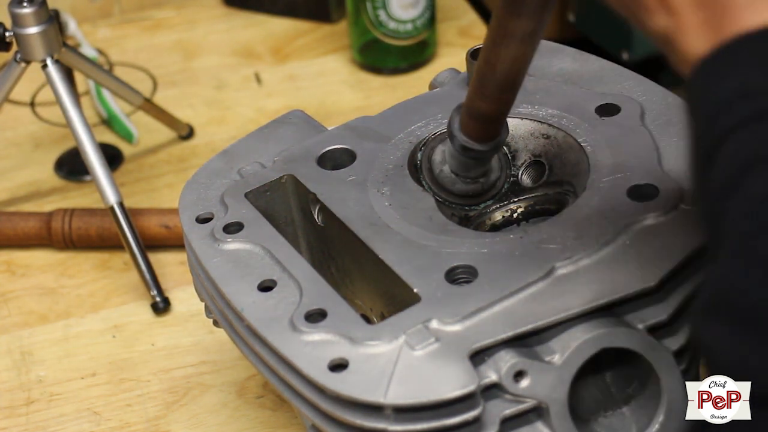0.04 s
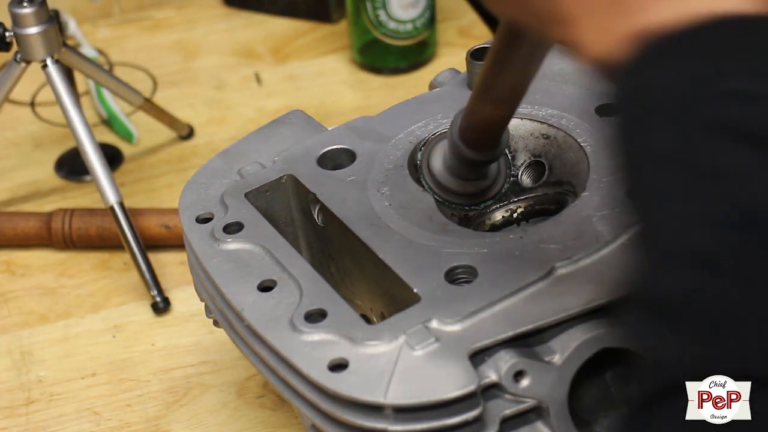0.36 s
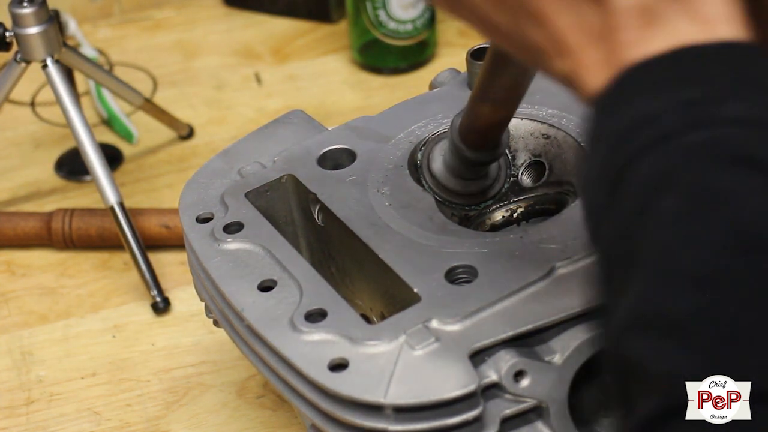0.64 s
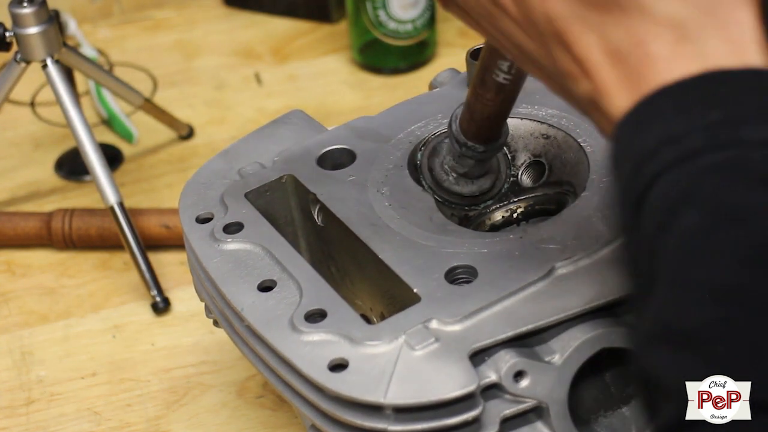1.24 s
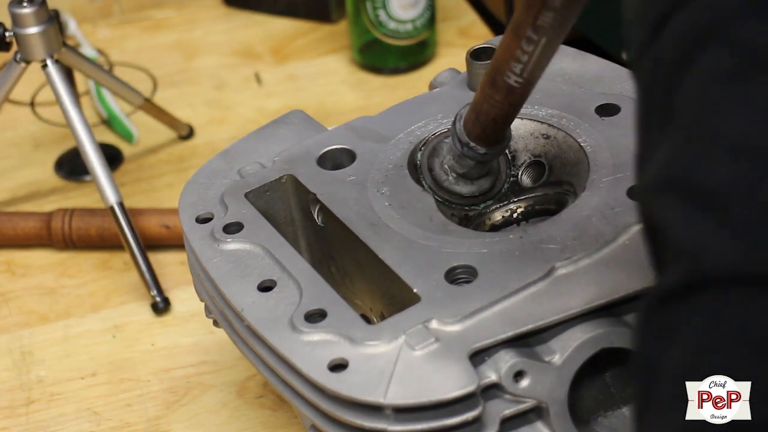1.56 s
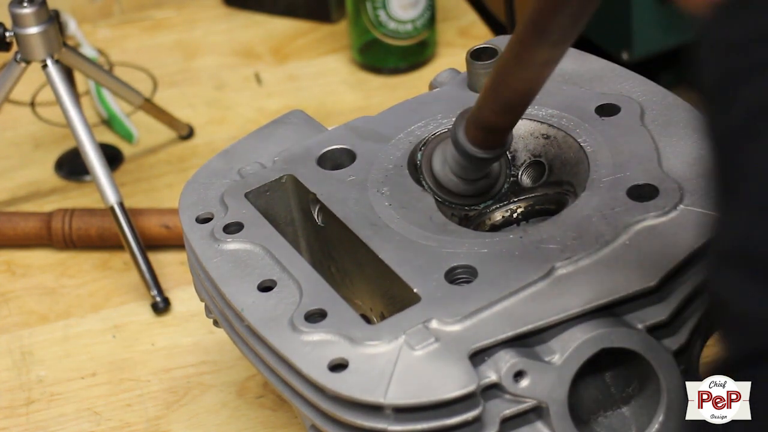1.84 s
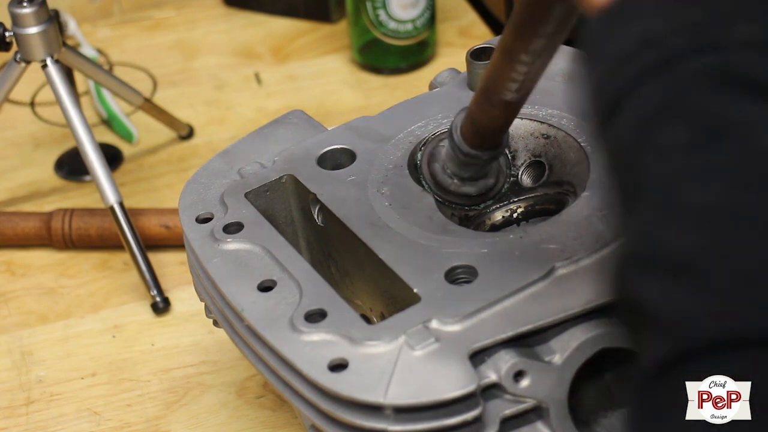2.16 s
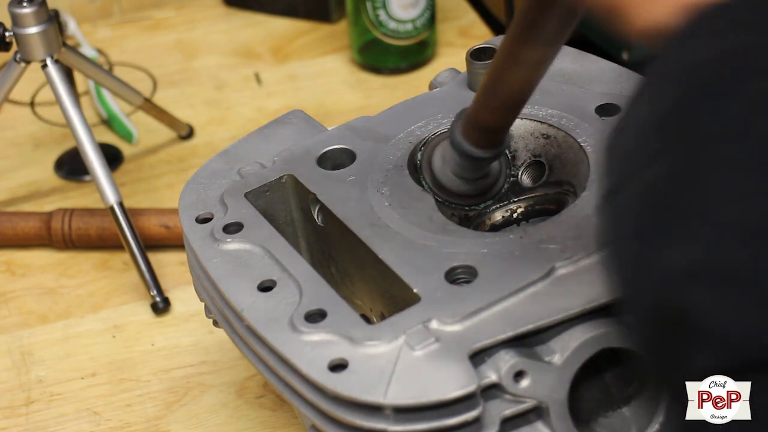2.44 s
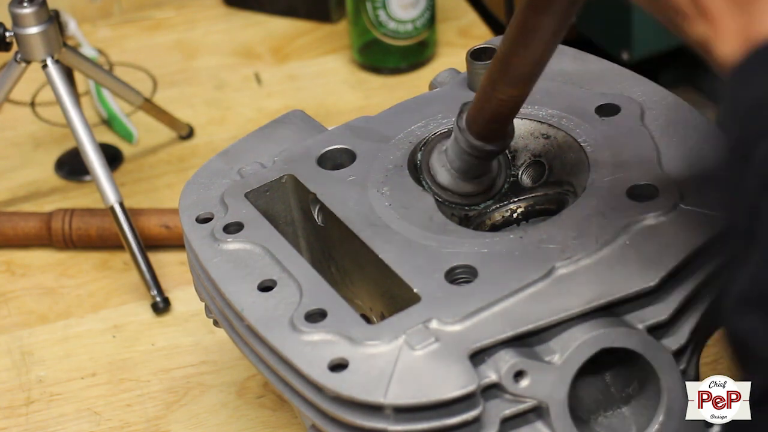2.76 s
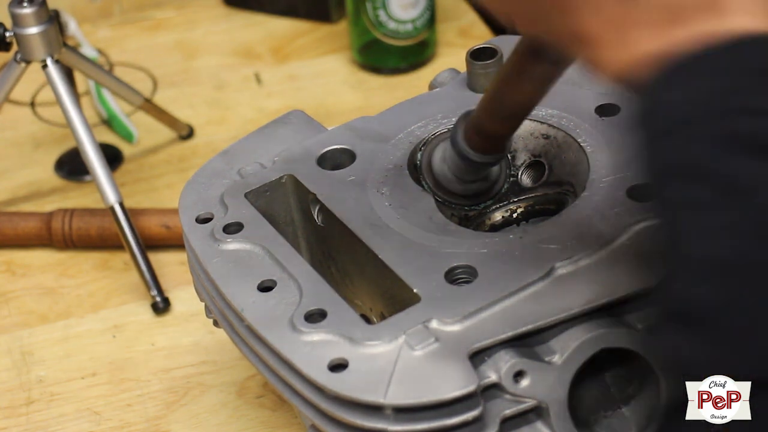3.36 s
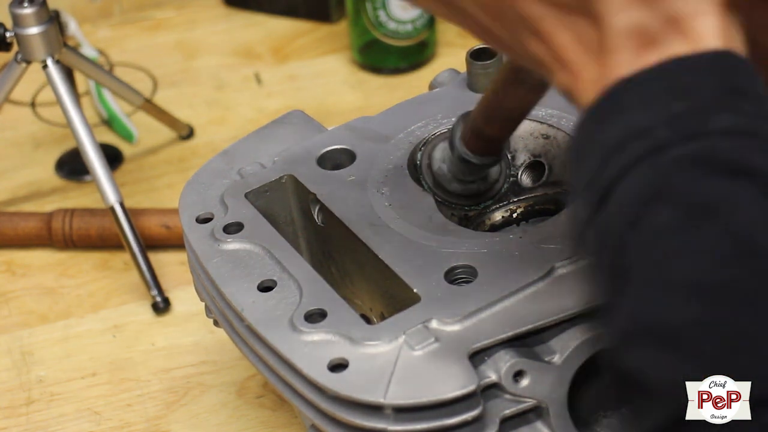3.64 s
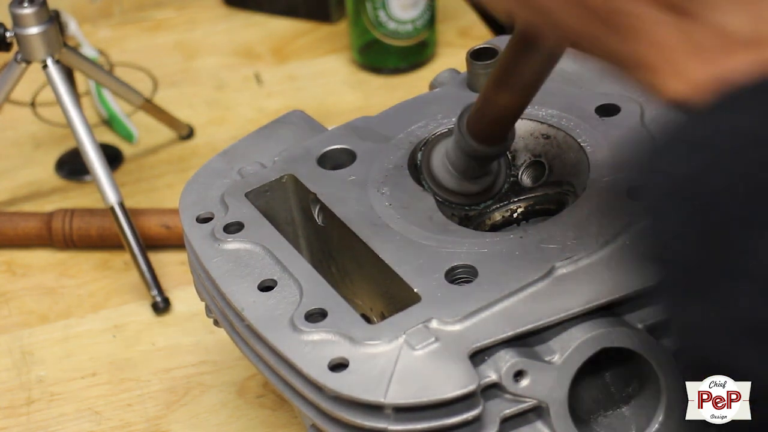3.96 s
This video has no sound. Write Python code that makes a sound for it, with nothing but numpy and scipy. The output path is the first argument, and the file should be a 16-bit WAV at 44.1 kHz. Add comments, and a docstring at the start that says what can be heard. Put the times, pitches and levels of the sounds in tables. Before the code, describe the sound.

A valve rasps in quick strokes against ringing metal, pausing briefly and knocking sharply twice.

```python
"""Grinding a valve into its seat

A wooden stick, twirled to and fro between the palms, turns a valve in an aluminium cylinder head.
Gritty paste hisses on every stroke and makes the metal casting ring, while the valve's stem chatters
in its guide. Twice the valve drops on its seat with a sharp knock. The workbench thuds underneath."""
import sys
import numpy as np
from scipy import signal
from scipy.fft import rfft, irfft, next_fast_len
from scipy.io import wavfile
from scipy.ndimage import uniform_filter1d, map_coordinates

SR = 44100
rng = np.random.default_rng(int(sys.argv[2]) if len(sys.argv) > 2 else 0)


def wav_out(sig):
    """Save sig, one row per channel (or a flat mono array), as 16-bit PCM at SR to the path in sys.argv[1]."""
    wavfile.write(sys.argv[1], SR, np.round(np.clip(np.atleast_2d(sig).T, -1, 1) * 32767).astype(np.int16))


N = 176400  # 4 seconds


def amp(db):
    """Turn decibels into a number to multiply by."""
    return 10 ** (np.asarray(db) / 20)


def unit(x):
    """Scale a signal to an average strength (rms) of 1."""
    return x / np.sqrt(np.mean(x ** 2) + 1e-20)


def steady(x):
    """Even out slow changes in loudness."""
    power = uniform_filter1d(np.mean(x ** 2, axis=0), size=SR // 25)
    return x / np.sqrt(np.abs(power) + 1e-12)


def along(points, hz):
    """Read between (pitch_hz, value) points, on a log scale of pitch."""
    pitches, values = np.transpose(points)
    return np.interp(np.log(hz + 1), np.log(pitches + 1), values)


def wobble(rate):
    """A smooth curve through `rate` random values a second."""
    return map_coordinates(rng.standard_normal(4096), [np.arange(N) * rate / SR], mode="wrap")


def filtered(x, response):
    """Multiply each frequency in x by response(hz)."""
    size = next_fast_len(N + SR // 2)
    return irfft(rfft(x, size) * response(np.fft.rfftfreq(size, 1 / SR)), size)[..., :N]


def fade(t, ring_s):
    """Die away by 60 dB in ring_s seconds."""
    return np.exp(-np.log(1000) * t / ring_s)


def ring(tones, t):
    """Add up fading tones from (pitch_hz, level_db, ring_s) rows."""
    return sum(amp(db) * fade(t, ring_s) * np.sin(2 * np.pi * hz * t) for hz, db, ring_s in tones)


def add(out, start_s, sound):
    """Mix a sound in at start_s."""
    part = out[..., round(start_s * SR):][..., :sound.shape[-1]]
    part += sound[..., :part.shape[-1]]


# How alike left and right sound, 1 being the same: pitch_hz, likeness
EAR_LIKENESS = [(300, 0.19), (1200, 0.99), (4000, 0.93), (12000, 0.42)]
def coloured(pair, colour=((100, 0), (16000, 0))):
    """Make two unrelated signals partly alike and give them a colour (a level at each pitch)."""
    def response(hz):
        angle = np.arccos(np.clip(along(EAR_LIKENESS, hz), -1, 1)) / 2
        return amp(along(colour, hz)) * np.array([np.cos(angle), np.sin(angle)])
    mid, side = filtered(pair, response)
    return unit(np.array([mid + side, mid - side]))


def noise(colour):
    """Stereo noise with this colour and a strength of 1."""
    return coloured(rng.standard_normal((2, N)), colour)


# Colour of the background hiss: pitch_hz, level_db
AIR_COLOUR = [(100, -7.5), (4000, -7), (16000, -8.5)]
def air(level_db=-71):
    """A faint, even hiss lies behind everything."""
    return amp(level_db) * noise(AIR_COLOUR)


# Thuds of the bench: start_s, level_db
BENCH_THUDS = [(.292, -40), (.393, -38.5), (.563, -37), (1.128, -30), (1.192, -27.5), (1.559, -36.5),
               (2.57, -40.5)]
# The bench's deep tones: pitch_hz, level_db, ring_s
BENCH_TONES = [(55, -8.5, 0.56), (96.8, -11, 0.18), (148.4, -2, .13)]
# Colours of the scuff in each thud and of the constant rumble: pitch_hz, level_db
SCUFF_COLOUR = [(100, 10.5), (380, -8), (600, -19.5), (1500, -34), (4000, -62)]
RUMBLE_COLOUR = [(20, 7), (38, -7.5), (80, 4.5), (110, -2.5), (155, -3), (205, -29.5), (330, -28),
                 (480, -36), (3000, -84)]
def bench(scuff_db=-8.5, rumble_db=-52.5, attack_s=0.0053):
    """The workbench rumbles under the twirling and thuds when the cylinder head rocks on it."""
    out, t = np.zeros((2, N)), np.arange(SR) / SR
    scuffs = noise(SCUFF_COLOUR)
    soft_contact = np.minimum(t / attack_s, 1)
    for i, (start_s, db) in enumerate(BENCH_THUDS):
        scuff = np.roll(scuffs, i * SR // 4, axis=1)[:, :SR] * fade(t, ring_s=0.2)
        add(out, start_s, amp(db) * soft_contact * (ring(BENCH_TONES, t) + amp(scuff_db) * scuff))
    return out + amp(rumble_db + 2 * wobble(31)) * noise(RUMBLE_COLOUR)


RING_REF_HZ = 3320  # ring times are scaled from this pitch
def with_fins(x, level_db, count=200, low_hz=2856.5, high_hz=16203, spread_db=3.5):
    """Add the ring of the cooling fins to a sound: many close, short tones, the high ones shortest."""
    t = np.arange(SR // 4) / SR
    hz = low_hz + (high_hz - low_hz) * (np.arange(count) + rng.random(count))[:, None] / count
    gains = amp(spread_db * rng.standard_normal(count)) * rng.choice([-1, 1], size=(2, count))
    tones = np.sin(2 * np.pi * hz * t) * fade(t, ring_s=0.17 * np.sqrt(RING_REF_HZ / hz))
    tail = coloured(gains @ tones)[:, :len(t)]
    return x + amp(level_db) * signal.fftconvolve(x, tail / np.linalg.norm(tail[0]), axes=1)[:, :N]


def casting_ring_s(hz):
    """How long a tone of the casting rings: low ones last longest."""
    return 0.18 + 0.42 * (RING_REF_HZ / hz) ** 3.67


# The casting's natural tones: pitch_hz, level_db
CASTING_TONES = [(1916, -69.5), (2261, -71.5), (2789, -70.5), (3198, -61), (3445, -66), (3688, -59),
                 (3830, -80), (3950, -66.5), (4245, -77), (4377, -64.5), (4447, -68.5), (4592, -65),
                 (4791, -66), (5284, -58.5), (5663, -64), (5820, -63), (6169, -64.5), (7903, -61),
                 (10880, -57), (14968, -66)]
def casting(rubbing):
    """Rubbing keeps the metal casting ringing at its natural tones."""
    # Long tones build up more, so they are turned down to make up for it.
    tones = [(hz, db - 10 * np.log10(casting_ring_s(hz)), casting_ring_s(hz))
             for hz, db in CASTING_TONES]
    body = ring(tones, np.arange(SR) / SR) * np.sqrt(4 * np.log(1000) / SR)
    under_way = np.pad(rubbing, ((0, 0), (SR, 0)), mode="reflect")  # already ringing at the start
    return signal.fftconvolve(under_way, body[None], axes=1)[:, SR:SR + N]


LOW_MODE_HZ, MAIN_MODE_HZ = 2261, 3198  # the two tones that sing out
# Moments when the casting sings: start_s, pitch_hz, level_db
SINGING_NOTES = [(0, LOW_MODE_HZ, -55), (.16, MAIN_MODE_HZ, -44.5), (.41, MAIN_MODE_HZ, -50),
                 (0.892, MAIN_MODE_HZ, -46.5), (1.089, MAIN_MODE_HZ, -43), (2.139, MAIN_MODE_HZ, -54),
                 (3.505, MAIN_MODE_HZ, -48)]
def singing(swell_s=0.018):
    """A stroke catches one tone of the casting, which swells and rings out."""
    out, t = np.zeros(N), np.arange(SR) / SR
    swell = np.minimum(t / swell_s, 1)
    for start_s, hz, db in SINGING_NOTES:
        phase = 2 * np.pi * (hz * t + rng.random()) + wobble(29)[:SR] / 2
        add(out, start_s, amp(db) * swell * fade(t, casting_ring_s(hz)) * np.sin(phase))
    return out


# Catches of coarse grit: middle_s, level_db
GRIT_CATCHES = [(.04, -60.5), (2.421, -57.5), (2.781, -55), (3.032, -57), (3.286, -61), (3.53, -61),
                (3.782, -56.5)]
def scrapes(pitch_hz=1900, width_hz=520, half_length_s=0.012, crackle_db=4):
    """Coarse grit catches: a short, rough scrape that falls in pitch."""
    out, t = np.zeros(N), np.arange(-SR // 20, SR // 20) / SR
    swell = np.exp(-.5 * (t / half_length_s) ** 2)
    for middle_s, db in GRIT_CATCHES:
        fall_per_s = 19 * (.5 + rng.random())
        phase = 2 * np.pi * np.cumsum(pitch_hz * np.exp(-fall_per_s * t)) / SR
        crackle = amp(crackle_db * wobble(width_hz)[:len(t)])
        rough = (wobble(2 * width_hz) + 1j * wobble(2 * width_hz))[:len(t)]
        scrape = unit(crackle * np.real(rough * np.exp(1j * phase)))
        add(out, max(middle_s + t[0], 0), amp(db) * swell * scrape)
    return out


# Drops on the seat and one faint tap: start_s, crack_db, valve_db, casting_db, bright_db
SEAT_KNOCKS = [(1.558, -34.5, -26.5, 12, -42), (1.762, -68.5, -67, -17, -89),
               (2.5694, -38.5, -27, -9, -36.5), (2.5733, -35, -56, 9, -30.5)]
# The valve's own tones: pitch_hz, level_db, ring_s
VALVE_TONES = [(1270, -3.5, 0.074), (1466, 2, 0.0087), (1950, -6, 0.012), (3910, -9.5, 0.038)]
# Colour of the crack as it lands: pitch_hz, level_db
CRACK_COLOUR = [(700, -5), (1400, 17.5), (2500, 3), (3900, 9.5), (6000, 6.5), (7000, 0), (9500, 8.5),
                (11200, 1), (15000, 10)]
def knocks(snap_db=17.5, bright_hz=7820, casting_band_hz=(2700, 8000), lowest_hz=1070):
    """Steel hits the seat: a crack rings the fins, the valve rings briefly and the casting longer."""
    snaps, rings, t = np.zeros((2, N)), np.zeros(N), np.arange(SR) / SR
    cracks = noise(CRACK_COLOUR)
    crack_shape = fade(t, ring_s=0.099) + amp(snap_db) * fade(t, ring_s=0.0038)
    casting_band = signal.butter(2, casting_band_hz, "bandpass", fs=SR)
    for i, (start_s, crack_db, valve_db, casting_db, bright_db) in enumerate(SEAT_KNOCKS):
        crack = np.roll(cracks, i * SR // 2, axis=1)[:, :SR] * crack_shape
        body = sum(rng.choice([-1, 1]) * ring([(hz, db + rng.normal(0, 0.74), casting_ring_s(hz))], t)
                   for hz, db in CASTING_TONES)
        mellow = amp(casting_db) * signal.lfilter(*casting_band, body)
        bright = ring([(bright_hz, bright_db, 0.15)], t)
        add(snaps, start_s, amp(crack_db) * crack)
        add(rings, start_s, amp(valve_db) * ring(VALVE_TONES, t) + mellow + bright)
    # The knocks carry very little bass.
    bass_cut = signal.butter(3, lowest_hz, "highpass", fs=SR, output="sos")
    return signal.sosfilt(bass_cut, with_fins(snaps, level_db=-3) + rings)


# Strokes of the stick, back and out in turn: start_s, grinding_db, chatter_db
STICK_STROKES = [(0.0, -41.0, -56.0), (0.119, -38.5, -59.0), (0.239, -40.5, -63.0), (0.371, -38.5, -59.0),
                 (0.483, -38.5, -60.0), (0.61, -40.5, -56.0), (0.722, -39.5, -61.0), (0.844, -38.5, -53.0),
                 (0.957, -39.5, -62.0), (1.07, -40.5, -60.0), (1.204, -42.5, -62.0), (1.346, -45.5, -65.0),
                 (1.391, -49.5, -70.0), (1.462, -59.0, -66.0), (1.55, -77.5, -80.0), (1.85, -68.0, -88.0),
                 (1.955, -43.0, -70.0), (2.116, -41.5, -66.0), (2.246, -42.5, -61.0), (2.373, -40.5, -61.0),
                 (2.492, -41.5, -55.0), (2.619, -40.5, -60.0), (2.735, -42.5, -58.0), (2.857, -41.5, -63.0),
                 (2.981, -43.5, -60.0), (3.106, -43.5, -67.0), (3.232, -44.5, -61.0), (3.355, -43.5, -67.0),
                 (3.476, -43.5, -65.0), (3.6, -45.5, -69.0), (3.721, -45.5, -61.0), (3.847, -44.5, -72.0),
                 (3.97, -47.5, -67.0)]
def twirling(t, rise_share=0.18, fall_share=0.48, last_stroke_s=0.12):
    """Each stroke speeds up, then slows. Gives its number, its progress (0 to 1) and the speed."""
    starts = np.transpose(STICK_STROKES)[0]
    lengths = np.diff(starts, append=starts[-1] + last_stroke_s)
    stroke = np.maximum(np.searchsorted(starts, t, side="right") - 1, 0)
    progress = np.clip((t - starts[stroke]) / lengths[stroke], 0, 1)
    speeding_up = np.sin(np.pi / 2 * np.minimum(progress / rise_share, 1))
    slowing_down = np.sin(np.pi / 2 * np.minimum((1 - progress) / fall_share, 1)) ** 3.47
    return stroke, progress, speeding_up * slowing_down


# Colour of the stem's rattle: pitch_hz, level_db
CHATTER_COLOUR = [(600, -38), (1050, -9.5), (1200, 4), (1280, 17.5), (1400, 4), (1600, -4.5), (2400, 1.5),
                  (4000, -23)]
def chatter(trim_db=-1.5, flutter_db=3.9):
    """The stem rattles in its guide, most of all when the valve turns fastest."""
    stroke, _, speed = twirling(np.arange(N) / SR)
    level_db = np.array(STICK_STROKES)[stroke, 2] + trim_db + flutter_db * wobble(75)
    return amp(level_db) * speed ** 0.76 * steady(noise(CHATTER_COLOUR))


# Bands of pitch that slide during an out or a back stroke: start_hz, end_hz, width_hz, boost_db
OUT_SLIDES = [(5060, 3600, 2000, 5.5), (11140, 9700, 1800, 4.5)]
BACK_SLIDES = [(3340, 5560, 580, 6.7), (12300, 6000, 650, 5.4)]
# A second grip gathers the rasp in one band: start_s, pitch_hz, width_hz, boost_db
GRIP_BAND = (1.5, 4340, 285, 7.3)
def grit(patchy_db=4.0, size_spread_db=0):
    """Crushed grains of paste make a patchy noise whose bands slide with the direction of turning."""
    grains = rng.standard_normal((2, N))
    sizes = amp(size_spread_db * np.repeat(rng.standard_normal(N), 8)[:N])  # all equal at 0 dB
    hz, t, spectrum = signal.stft(grains * sizes, SR, nperseg=256)
    stroke, progress, _ = twirling(t)

    def bands(rows):
        return sum(db * np.exp(-.5 * ((hz[:, None] - start - (end - start) * progress) / width) ** 2)
                   for start, end, width, db in rows)
    patches = uniform_filter1d(rng.standard_normal(spectrum.shape[1:]), size=5, axis=0)  # blur in pitch
    patches = unit(uniform_filter1d(patches, size=9, axis=1))  # blur in time
    slides_db = np.where(stroke % 2, bands(OUT_SLIDES), bands(BACK_SLIDES))
    grip_s, grip_hz, width_hz, boost_db = GRIP_BAND
    second_grip_db = 0.83 * slides_db + bands([(grip_hz, grip_hz, width_hz, boost_db)])
    colour_db = np.where(t < grip_s, slides_db, second_grip_db) + patchy_db * patches
    _, crunch = signal.istft(spectrum * amp(colour_db), nperseg=256)
    return steady(crunch[:, :N])


# Colours of the paste's rasp and of its higher hiss: pitch_hz, level_db
RASP_COLOUR = [(700, -89), (1500, -16), (2100, -16.5), (2750, -4), (3200, -4.5), (3900, 2), (4450, -4),
               (5800, 6.5), (6600, -2.5), (8000, -12)]
HISS_COLOUR = [(3000, -71), (6600, -15), (7650, -4.5), (8050, 5), (8900, -1.5), (9700, 4), (11800, 4),
               (12600, -2), (13700, -1.5), (15000, 11.5), (15800, -2)]
def grinding(rasp_db=-12, hiss_db=-8, ring_db=-2, uneven_db=2.2, firm_stroke_db=-36):
    """Paste between valve and seat rasps and hisses with the speed, ringing the fins and the casting."""
    stroke, _, speed = twirling(np.arange(N) / SR)
    stroke_db = np.array(STICK_STROKES)[stroke, 1]
    grains = grit() * amp(uneven_db * wobble(70))  # unsteady hand pressure
    rasp_level = amp(stroke_db) * speed ** 0.41
    back_db = np.where(stroke % 2, 0, 1)  # the back stroke hisses more
    hiss_level = amp(firm_stroke_db + 0.9 * (stroke_db - firm_stroke_db) + back_db) * speed ** 0.61
    rasp = amp(rasp_db) * rasp_level * steady(coloured(grains, RASP_COLOUR))
    hiss = amp(hiss_db) * hiss_level * steady(coloured(grains, HISS_COLOUR))
    rubbing = unit(rasp_level * coloured(grains))
    return with_fins(rasp + hiss, level_db=0.5) + amp(ring_db) * casting(rubbing)


# How much louder the left side is than the right: pitch_hz, level_db
LEFT_LOUDER = [(30, -6), (1200, 0.5), (5000, -0.4), (14000, -1.5)]
# How far the left side's wave runs ahead: pitch_hz, phase_radians
LEFT_AHEAD = [(5500, 0.2345), (9800, -0.99), (12500, -3.5)]
def scene():
    """All the sounds together, heard from slightly right of centre."""
    mix = grinding() + singing() + scrapes() + chatter() + knocks() + bench() + air()
    sides = np.array([[.5], [-.5]])

    def placement(hz):
        return amp(sides * along(LEFT_LOUDER, hz)) * np.exp(1j * sides * along(LEFT_AHEAD, hz))
    return filtered(mix, placement)


TOP_HZ = 15900
def record(dry):
    """Cut away the very highest treble."""
    return filtered(dry, lambda hz: hz < TOP_HZ)


dry = scene()
out = record(dry)
wav_out(out)
```